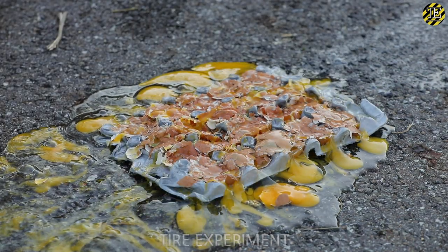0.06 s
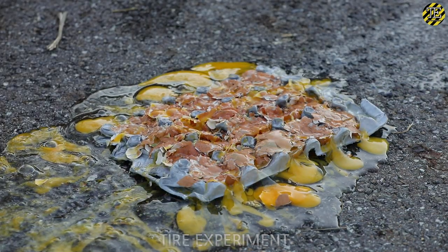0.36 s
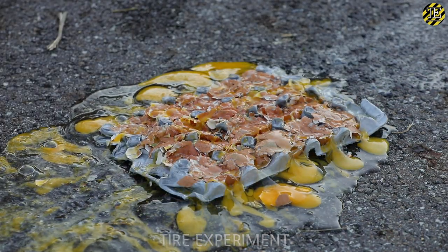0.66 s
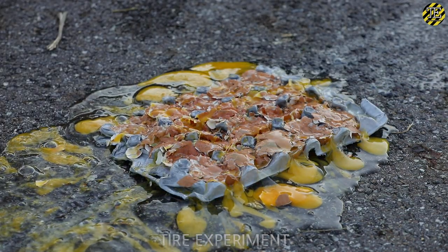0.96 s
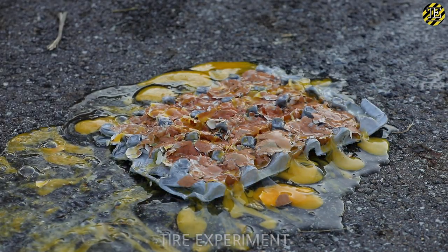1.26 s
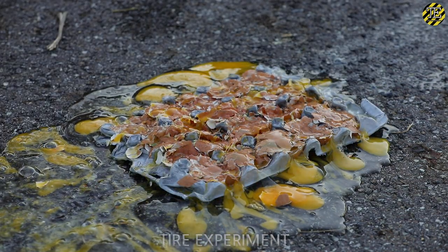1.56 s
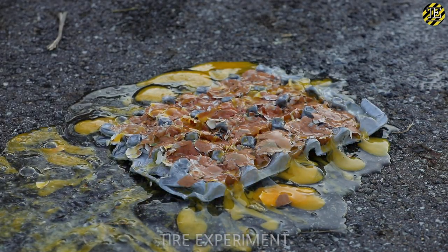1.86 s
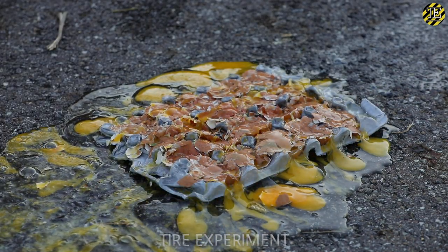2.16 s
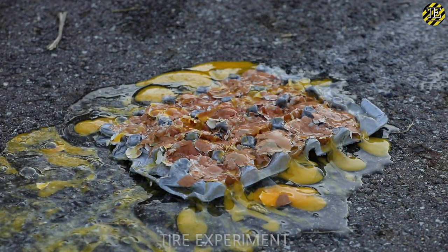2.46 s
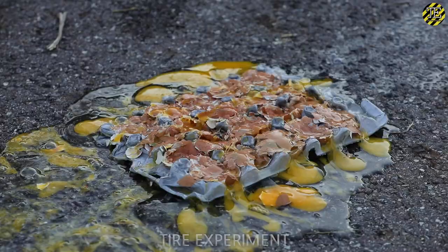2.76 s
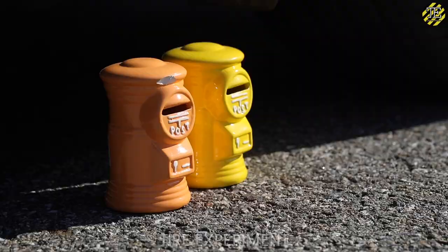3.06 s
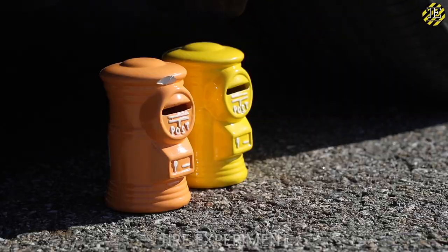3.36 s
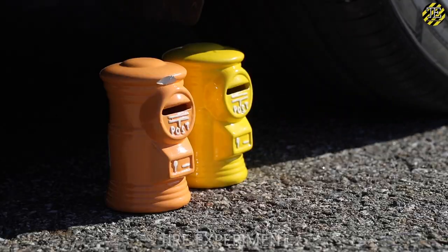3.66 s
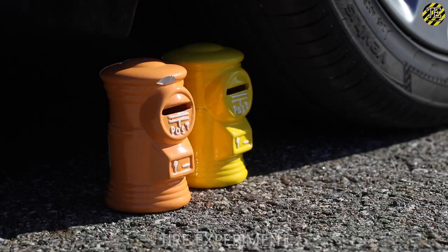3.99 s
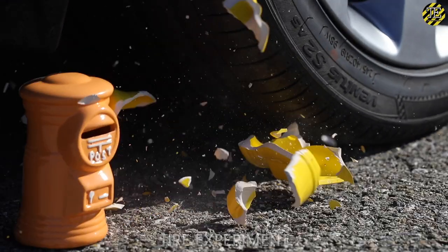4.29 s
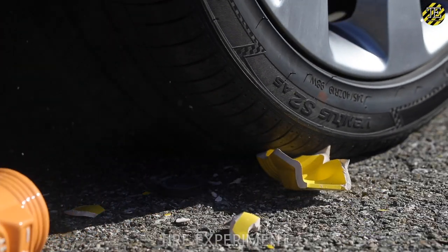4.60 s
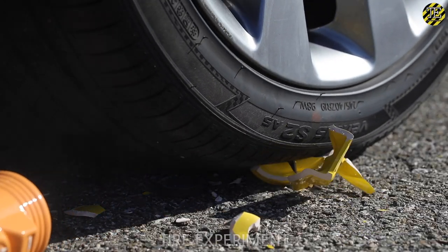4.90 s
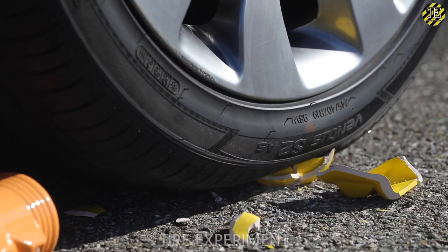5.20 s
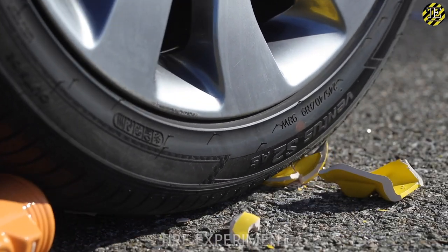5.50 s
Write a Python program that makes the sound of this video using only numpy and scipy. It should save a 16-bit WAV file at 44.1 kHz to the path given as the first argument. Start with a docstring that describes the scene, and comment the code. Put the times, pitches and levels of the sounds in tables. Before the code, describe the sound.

A car idles quietly outdoors, its low exhaust puffs softening after about a second, while crushed eggs give faint wet ticks. Around 1.9 to 2.2 seconds come a few soft, dull knocks and a short gritty scuff. At 3.1 seconds the engine sound changes abruptly to a slightly fuller rush as the car creeps forward. At about 4.3 seconds a hollow ceramic money box bursts with a very loud crack and a pop of air, briefly overloading the close microphone. Crumbs spray and shards land on the asphalt with bright, short clinks. From 4.6 to 5.1 seconds the tyre breaks pieces with dry snaps, thuds and brief grinding, and a curved shard rocks to rest. A few faint snaps follow. At about 5.6 seconds, right at the end, a second box bursts with another loud crack. The engine runs underneath throughout, and the cracks leave only a short echo.

```python
"""A car idles on asphalt, its exhaust puffing, while crushed eggs in a tray beside it tick wetly.
A few soft knocks and a scuff sound nearby. The scene cuts to the car creeping onto two hollow ceramic
money boxes. The first bursts with a crack and a pop of air; its shards ring as they land on the road
and snap under the tyre. The second bursts too. The close microphone overloads on the loudest cracks."""
import sys
import numpy as np
from scipy import signal
from scipy.fft import rfft, irfft, next_fast_len
from scipy.io import wavfile

SR = 44100
rng = np.random.default_rng(int(sys.argv[2]) if len(sys.argv) > 2 else 0)


def wrap_up_sound(samples):
    """Save the sound to the file named by the first command line argument, as 16-bit audio."""
    columns = np.atleast_2d(samples).T
    # keep every value between -1 and 1, then stretch to whole-number steps
    tamed = np.clip(columns, -1, 1)
    steps = np.round(tamed * 32767).astype(np.int16)
    wavfile.write(sys.argv[1], SR, steps)


N = 248724
TIME = np.arange(N) / SR
AGE = TIME[:SR // 3]   # seconds since a blow
SCENE_CUT_S = 3.13   # the scene cuts abruptly from the idling car to the creeping car


def bursts(attack_s=0.00036):
    """Cracks race through the wall of a box; the air inside pops out and the wall thumps."""
    # runs of cracks: t/s, length/s, level/dB, time to fade by 60 dB (t60)/s
    fractures = [(4.2692, .006, -10, .03), (4.2795, .012, -12, .028), (4.3098, .002, -22, .045),
                 (5.6087, .001, -12, .012), (5.6117, .004, -8.5, .03)]
    # tone colour of the cracking: f/Hz, width/Hz, level/dB
    fracture_bands = [(495, 52, -11), (1060, 100, -10.5), (2140, 610, -3), (3670, 2000, 0.5),
                      (6000, 1700, -0.5), (11500, 4600, -3.5)]
    # pops of air and thumps of the wall: t/s, f/Hz, level/dB, t60/s
    air_pops = [(4.2695, 676, -1.5, 0.0092), (4.272, 450, -24, 0.17), (4.277, 320, -11, 0.038),
                (4.278, 97, -21, 0.15), (4.295, 217, -23, 0.089), (5.612, 1093, -20, 0.088),
                (5.612, 2025, -25.5, 0.091), (5.612, 468, -19, 0.029), (5.614, 177, -24.5, 0.053)]
    out = np.zeros(N)
    for s, length, db, t60 in fractures:
        hold_then_fade = np.interp(AGE - length, AGE, fade(t60))
        attack = 1 - np.exp(-AGE / attack_s)
        cracking = body_noise(fracture_bands) * ragged(depth_db=3.5, per_s=700)
        add(out, s, from_db(db) * cracking * attack * hold_then_fade)
    for s, hz, db, t60 in air_pops:
        add(out, s, from_db(db) * ring(hz, t60))
    return out


def clinks(scrape_db=-11, rock_brightness=-16.5):
    """Each shard rings with its own tones; each landing has its own loudness and brightness."""
    # the tones of each named shard: f/Hz, level/dB, t60/s
    shard_tones = { "wall": [(2220, -13, .13), (2410, -1, .14), (3630, -15, .14), (4500, -11, .08),
                   (4953, -12, .07), (5580, 0, .1), (6500, -7, .06), (7550, -12, .1)],
                   "base": [(2184, -9, 0.047), (2475, 0.5, 0.091), (4135, -15.5, 0.047), (4920, -17, 0.059),
                   (5690, -25, 0.212), (6400, -33, 0.11), (10000, -44, 0.09), (13540, -44.5, 0.0784)],
                   "rim": [(4470, -1, 0.075), (4800, -14, 0.056), (5680, -6.5, 0.15), (8000, -15, 0.081),
                   (8970, -11.5, 0.055), (13500, -16.5, .06), (14400, -12, 0.045)],
                   "curve": [(2030, -25, 0.034), (3465, 0, 0.095), (4750, -9.5, 0.048), (5860, -25, 0.18),
                   (6412, -14, 0.1), (7840, -24, 0.086), (8650, -30, 0.093), (12600, -34, .06)],
                   "plate": [(3920, -11.5, 0.13), (5970, 4, 0.052), (6220, -25, 0.53), (8800, -21, .12),
                   (9264, -30, 0.04), (10500, -23, 0.032)], "sliver": [(3950, -5.5, 0.031),
                   (4940, -15, 0.067), (6000, -8.5, 0.11), (8000, -5, .08), (10800, -5, 0.044),
                   (15110, -18, 0.053)], "flake": [(7170, -0.5, 0.049), (9000, -17, 0.11),
                   (12120, -3, 0.055), (12920, -8.5, .05)], "chip": [(8600, -8, 0.072), (9450, 3.5, 0.064),
                   (10562, -11, .06), (13960, -6, .05)]}
    # the louder shards land and collide: t/s, shard, level/dB, brightness/(dB per octave)
    landings = [(4.279, "wall", -12, 0), (4.309, "flake", -24, 2), (4.342, "flake", -29, 9),
                (4.365, "wall", -33.5, -5), (4.415, "plate", -22.5, 18), (4.4286, "wall", -24.5, -3),
                (4.429, "sliver", -29, 1), (4.4462, "rim", -24, 8.5), (4.476, "rim", -23.5, -22),
                (4.560, "sliver", -29.5, -4), (4.579, "plate", -32.5, 14), (4.602, "base", -33, 12),
                (4.6476, "base", -8.5, 1), (4.787, "rim", -35, 1), (4.831, "chip", -38, -1),
                (4.866, "rim", -33.5, -1), (4.91, "plate", -44.5, -22), (5.084, "rim", -31, -2),
                (5.169, "curve", -31.5, 11), (5.315, "curve", -43, 8.5)]
    # a curved shard rocks to rest: t/s, level/dB
    rock_taps = [(4.986, -30.5), (5.1588, -22.5), (5.258, -47), (5.309, -51)]
    rocking = [(s, "curve", db, rock_brightness) for s, db in rock_taps]
    out = np.zeros(N)
    for s, shard, db, brightness in landings + rocking + skitters():
        tones = shard_tones[shard]
        main_hz = max(tones, key=lambda tone: tone[1])[0]
        scrape = band_noise(main_hz, main_hz, len(AGE)) * fade(t60=0.0032)
        add(out, s, from_db(db + scrape_db) * scrape)
        for hz, tone_db, t60 in tones:
            level_db = db + tone_db + brightness * np.log2(hz / main_hz) + rng.standard_normal()
            # an uneven piece has a weak twin beside each tone, and the two beat
            twin = .12 * ring(hz * rng.uniform(1.02, 1.08), t60)
            add(out, s, from_db(level_db) * (ring(hz, t60) + twin))
    return out


def skitters(start_s=4.31, db=-34, fall_db_per_s=10.5, brightness=2.5):
    """Small shards land at random after the first burst, ever softer; gives rows for clinks()."""
    small = ["rim", "plate", "sliver", "flake", "chip"]
    return [(s, rng.choice(small), db - fall_db_per_s * (s - start_s), brightness)
            for s in scattered(start_s, length_s=0.92, per_s=11)]


def snaps(lead_s=.0035, lead_db=-36.5, grind_db=-19):
    """Shards snap. Under the tyre a small crack leads to the break, a thud and a brief grinding."""
    # hard hits and small dry snaps: t/s, level/dB, f/Hz
    dry_snaps = [(4.3493, -3.5, 3670), (4.364, -7.5, 2960), (4.416, -16.5, 3776), (4.4285, -4.5, 6000),
                 (4.446, -8.5, 3270), (4.476, -21, 4370), (4.566, -22.5, 6000), (4.703, -31, 5500),
                 (4.7751, -27.5, 6200), (4.841, -36, 9000), (4.8635, -32, 7400), (4.956, -28.5, 6000),
                 (5.233, -52, 8000), (5.258, -42, 2190), (5.344, -36.5, 1590), (5.4159, -38.5, 2320)]
    # the tyre breaks a piece and slaps it down: t/s, crack/dB, crack/Hz, thud/dB, thud pitch ratio
    crushes = [(4.647, -8.5, 1800, -20.5, 0.45), (4.7348, -5.5, 4000, -13.5, 0.8),
               (5.0248, -19, 6330, -16, 0.93), (5.0801, -16.5, 6000, -4.5, 0.92),
               (5.1142, -16, 5000, -11, 0.93)]
    # tyre and road ring briefly: f/Hz, width/Hz, level/dB
    tread_bands = [(170, 580, -12), (360, 120, -2.5), (524, 64, 1), (1100, 175, 0.5), (1270, 2300, -3)]
    out = np.zeros(N)
    for s, db, hz in dry_snaps:
        add(out, s, crack(db, hz))
    for s, crack_db, crack_hz, thud_db, pitch in crushes:
        add(out, s - lead_s, crack(lead_db, crack_hz))
        add(out, s, crack(crack_db, crack_hz))
        thud = body_noise([(pitch * hz, width, db) for hz, width, db in tread_bands])
        thud *= fade(t60=0.016) + from_db(grind_db) * fade(t60=0.084)
        add(out, s, from_db(thud_db) * cut(thud, 1700, "low"))
    return out


def crack(db, hz, splinter_db=-12, spike_db=1):
    """One piece breaks: a short, dry burst of noise with a splintery top."""
    body = band_noise(hz, 0.45 * hz, len(AGE))
    splinters = from_db(splinter_db) * cut(rng.standard_normal(len(AGE)), 15000, "high")
    envelope = (fade(t60=0.011) + from_db(spike_db) * fade(t60=0.004)) / 2
    return from_db(db) * (body + splinters) * envelope


def crumbs(start_per_s=2300, shrink_db=5, spread_db=4.5, tick_db=5, crumble_db=12, pitches=60):
    """Crumbs of glaze fall, fewer and finer as a shower dies; each ticks and gives a tiny high ring."""
    # showers thrown by the burst, landing, and shed under the tyre: t/s, level/dB, dying time/s
    showers = [(4.276, -18, 0.086), (4.427, -18.5, 0.041), (4.647, -33, 0.23), (5.08, -41, 0.11)]
    grains = np.zeros(N)
    for s, db, dying_s in showers:
        spent = np.maximum(TIME - s, 0) / dying_s
        size_db = spread_db * (np.minimum(rng.exponential(1, N), 4) - 4)
        sizes = from_db(db - shrink_db * spent + size_db) * rng.choice([-1, 1], N)
        falls = (TIME > s) & (rng.random(N) < start_per_s * np.exp(-spent) / SR)
        grains += sizes * falls
    pitch_index = rng.integers(0, pitches, N)
    out = from_db(tick_db) * cut(resonate(grains, 6000, 6000), 11000, "low")
    out += from_db(crumble_db) * cut(resonate(grains, 880, 1600), 3500, "low")
    for k, hz in enumerate(np.geomspace(3900, 15000, pitches) * rng.uniform(.98, 1.02, pitches)):
        tink = from_db(-5 - 2 * np.log2(hz / 7000)) * ring(hz, t60=190 / hz)   # higher: softer, shorter
        for i in np.flatnonzero((grains != 0) & (pitch_index == k)):
            add(out, i / SR, grains[i] * tink)
    return out


def engine(idle_rush_db=-63.7, creep_rush_db=-60):
    """The engine fires through the exhaust; the fan's rush and the hum throb with each firing."""
    # engine speed: t/s, firings per second
    speed_curve = [(0.0, 21.9), (1.57, 24.7), (2.91, 23.7), (3.33, 23.5), (3.6, 24), (3.9, 27.4),
                   (4.23, 24.0), (4.74, 22.7), (5.23, 24), (5.64, 23.3)]
    # rush of engine and fan while idling: f/Hz, level/dB
    idle_spectrum = [(30, -16), (150, 1.5), (300, 0), (420, -5), (600, -2.5), (1150, -5), (1700, -10),
                     (3000, -16.5), (5000, -24.5), (8000, -31.5), (12000, -41), (16000, -59)]
    # the rush while creeping: f/Hz, level/dB
    creep_spectrum = [(40, -15), (130, 8), (200, 7), (400, 2.5), (800, 1), (1200, -0.5), (2700, -4.5),
                      (4000, -12), (6400, -17), (11400, -31), (16000, -48.5)]
    # hum of the engine bay: f/Hz, width/Hz, idling level/dB, creeping level/dB
    hum_bands = [(308.7, 13, -67.5, -68.5), (1154, 29, -73.5, -80), (1365, 15, -76, -76)]
    firings_per_s = np.interp(TIME, *np.transpose(speed_curve))
    cycle = 0.059 + np.cumsum(firings_per_s) / SR   # rises by one per firing
    creeping = TIME > SCENE_CUT_S
    creep_rush = from_db(creep_rush_db) * coloured(creep_spectrum)
    idle_rush = from_db(idle_rush_db) * coloured(idle_spectrum)
    rush = np.where(creeping, creep_rush, idle_rush)
    hum = np.zeros(N)
    for hz, width, idle_db, creep_db in hum_bands:
        drone = rms_one(resonate(band_noise(hz, width, N), hz, width))
        hum += from_db(np.where(creeping, creep_db, idle_db)) * drone
    throb = 1 + 0.11 * np.cos(2 * np.pi * cycle)
    return exhaust(cycle, firings_per_s, creeping) + (rush + hum) * throb


def exhaust(cycle, firings_per_s, creeping, firm_db=-52, settled_db=-58.5, creep_db=-60, puff_s=0.0081):
    """Each firing swings the air in the pipe once; puffs soften as the idle settles and at the cut."""
    settled = 1 / (1 + np.exp((1.1 - TIME) / .25))   # goes from 0 to 1 around 1.1 s
    level_db = np.where(creeping, creep_db, firm_db + (settled_db - firm_db) * settled)
    pipe_hz = np.where(creeping, 85, 97)
    from_peak_s = (cycle % 1 - .5) / firings_per_s
    envelope = np.exp(-(from_peak_s / puff_s) ** 2)
    swing = np.cos(2 * np.pi * pipe_hz * from_peak_s + .3)
    push = from_db(-10) * ~creeping   # a slower push of gas, only while idling
    return cut(from_db(level_db) * envelope * (swing + push), 10, "high", order=1)


def knocks():
    """A few soft, dull knocks: each blow rings briefly and fades."""
    # blows: t/s, level/dB
    blows = [(1.857, -43), (1.92, -45), (2.046, -49), (2.143, -50.5), (2.175, -49), (2.205, -53.5)]
    # what the knocks ring with: f/Hz, width/Hz, level/dB
    knock_bands = [(174, 63, -1), (436, 150, -6), (618, 50, 1.5), (880, 220, -8.5)]
    out = np.zeros(N)
    for s, db in blows:
        add(out, s, from_db(db) * cut(body_noise(knock_bands), 1260, "low") * fade(t60=0.14))
    return out


def egg_ticks(faint_db=-64.5, faint_hz=4400, crackle_db=-8, pop_db=-13):
    """Crushed eggs settle; each tick is a little crackle around a tiny pitched pop."""
    # the clearest ticks of wet shell and grit: t/s, level/dB, f/Hz
    clear_ticks = [(0.12, -61.5, 8100), (0.155, -63, 6000), (0.336, -58.5, 7600), (0.787, -62, 8300),
                   (1.174, -65, 5560), (1.52, -61, 8500), (1.567, -62, 5430), (2.28, -64.5, 6000),
                   (2.504, -61.5, 8250), (4.151, -56.5, 6590)]
    faint_ticks = [(s, faint_db, faint_hz * rng.uniform(0.7, 1.8))
                   for s in scattered(0, SCENE_CUT_S, per_s=5)]
    out = np.zeros(N)
    for s, db, hz in clear_ticks + faint_ticks:
        cluster = ragged(depth_db=4, per_s=320) * fade(t60=0.089)
        crackle = cut(band_noise(hz, 1600, len(AGE)), 14400, "low") * cluster
        add(out, s, from_db(db + crackle_db) * crackle)
        add(out, s, from_db(db + pop_db) * ring(hz * rng.uniform(.7, 1), t60=0.041))
    return out


def scuff(start_s=2.14, catch_s=2.212, drag_db=-69, catch_db=-57):
    """A gritty drag over the asphalt swells, holds and ends in a short catch."""
    scrape = cut(band_noise(2500, 2200, N) + from_db(2) * band_noise(410, 340, N), 4300, "low")
    outside_s = np.maximum(start_s - TIME, 0) + np.maximum(TIME - catch_s, 0)
    drag = from_db(drag_db) * np.exp(-outside_s / 0.012)
    catch = from_db(catch_db) * np.exp(-np.abs(TIME - catch_s) / 0.0088)
    return scrape * (drag + catch)


def surroundings(x):
    """Sound bounces quickly between the road and the car's underside, then leaves a faint outdoor tail."""
    near, far = (-15, 0.26, 4000), (-27, .55, 5000)   # level/dB, t60/s, treble cut/Hz
    response = 0
    for db, t60, hz in near, far:
        echoes = cut(rng.standard_normal(len(AGE)), hz, "low", order=1) * fade(t60) * (AGE > .002)
        response += from_db(db) * echoes / np.sqrt(np.sum(fade(t60) ** 2))
    return x + signal.fftconvolve(x, response)[:N]


def from_db(db):
    """Decibels to gain."""
    return 10 ** (np.asarray(db) / 20)


def rms_one(x):
    """Scale to an average power of 1."""
    return x / np.sqrt(np.mean(x ** 2) + 1e-20)


def add(out, s, sound):
    """Mix a sound in from time s."""
    start = round(s * SR)
    out[start:start + len(sound)] += sound[:max(N - start, 0)]


def fade(t60):
    """Die away after a blow, by 60 dB in t60 seconds."""
    return np.exp(-np.minimum(np.log(1000) * AGE / t60, 40))


def ring(hz, t60):
    """One struck tone that dies away."""
    return np.sin(2 * np.pi * hz * AGE) * fade(t60)


def ragged(depth_db, per_s):
    """A gain that jumps about at random after a blow."""
    steps = rng.standard_normal(size=1000)
    return from_db(depth_db * np.interp(AGE * per_s, np.arange(len(steps)), steps))


def scattered(start_s, length_s, per_s):
    """Uneven moments, one somewhere in each equal slot of time."""
    ages = (np.arange(60) + rng.random(size=60)) / per_s
    return start_s + ages[ages < length_s]


def cut(x, hz, kind, order=2):
    """Keep what lies below hz ("low") or above it ("high")."""
    return signal.sosfilt(signal.butter(order, hz, kind, fs=SR, output="sos"), x)


def resonate(x, hz, width_hz):
    """A resonance: lets through a band around hz."""
    r = np.exp(-np.pi * width_hz / SR)
    feedback = [1, -2 * r * np.cos(2 * np.pi * hz / SR), r * r]
    return signal.lfilter(np.array([1, 0, -1]) * (1 - r * r) / 2, feedback, x + 1e-18)


def band_noise(hz, width_hz, size):
    """Noise in one band, power 1."""
    return rms_one(resonate(rng.standard_normal(size), hz, width_hz))


def body_noise(bands):
    """Noise in several bands, power 1."""
    return rms_one(sum(from_db(db) * band_noise(hz, width, len(AGE)) for hz, width, db in bands))


def coloured(spectrum):
    """Steady noise of a given spectrum, power 1."""
    hz, db = np.transpose(spectrum)
    size = next_fast_len(N)
    bin_hz = np.maximum(np.fft.rfftfreq(size, 1 / SR), 1)
    gains = from_db(np.interp(np.log(bin_hz), np.log(hz), db))
    return rms_one(irfft(rfft(rng.standard_normal(size)) * gains, size)[:N])


def scene():
    """The breaking ceramic and its echoes, over the running car and the small sounds nearby."""
    background = engine() + scuff()
    ceramic = surroundings(bursts() + snaps() + crumbs() + clinks())
    return (ceramic + background + knocks() + egg_ticks())[None]


def record(dry, knee=4, top_hz=16000):
    """The microphone overloads, sooner on the wave's downward swing; rumble and the very top are cut."""
    limit = np.where(dry > 0, .7, .4)
    overloaded = dry / (1 + np.abs(dry / limit) ** knee) ** (1 / knee)
    steep_lowpass = signal.ellip(10, .2, 80, top_hz, fs=SR, output="sos")
    return signal.sosfilt(steep_lowpass, cut(overloaded, 22, "high", order=1))


dry = scene()
out = record(dry)
wrap_up_sound(out)
```